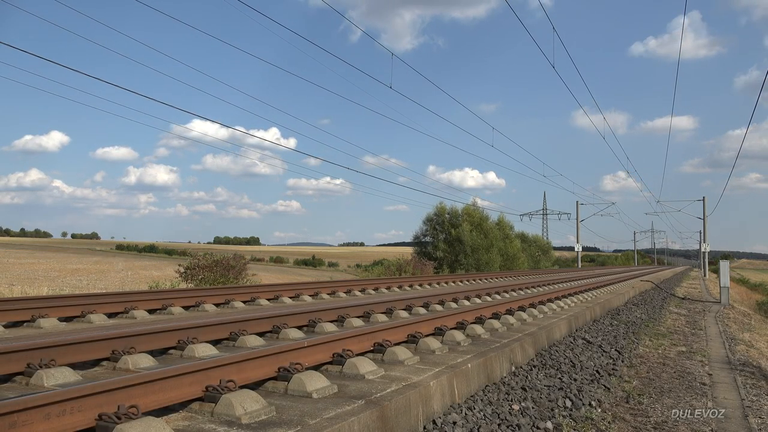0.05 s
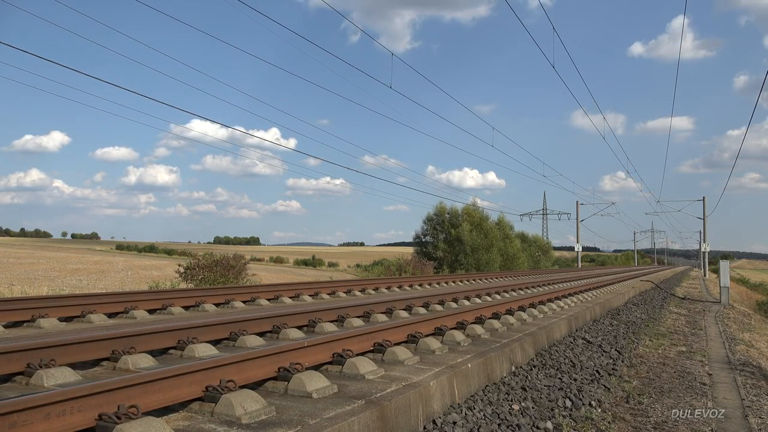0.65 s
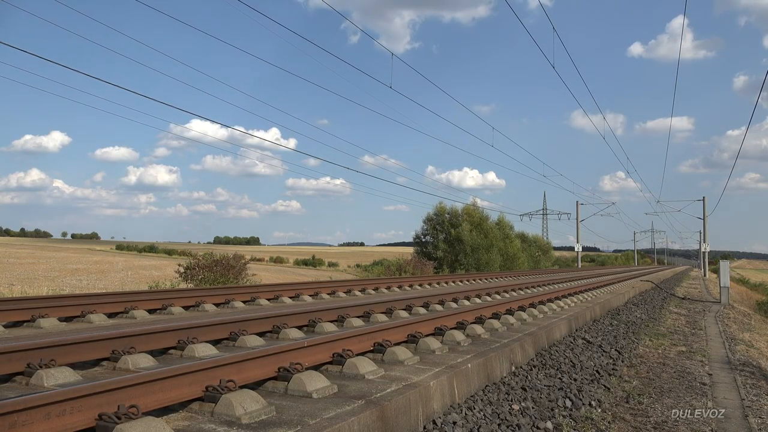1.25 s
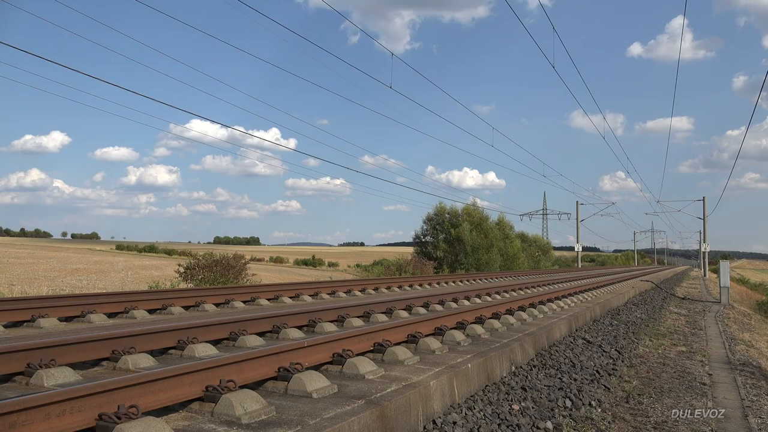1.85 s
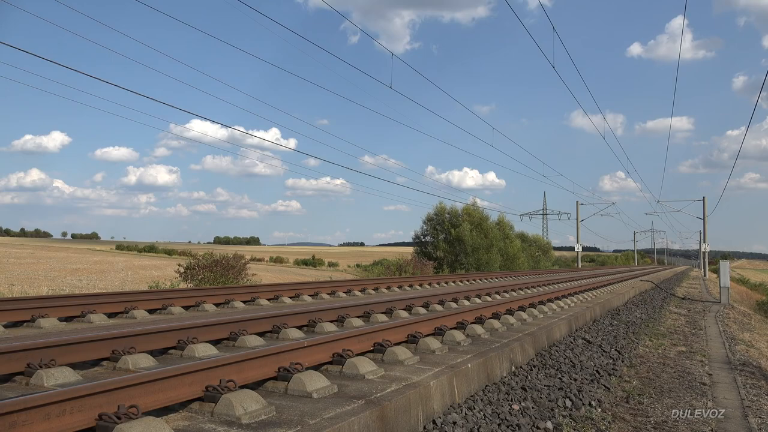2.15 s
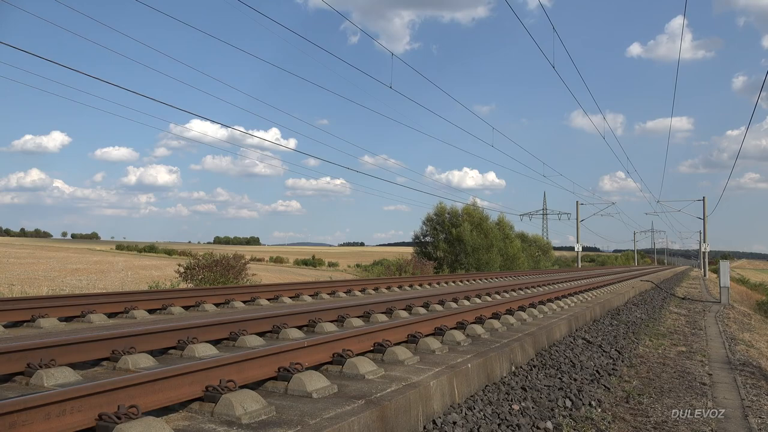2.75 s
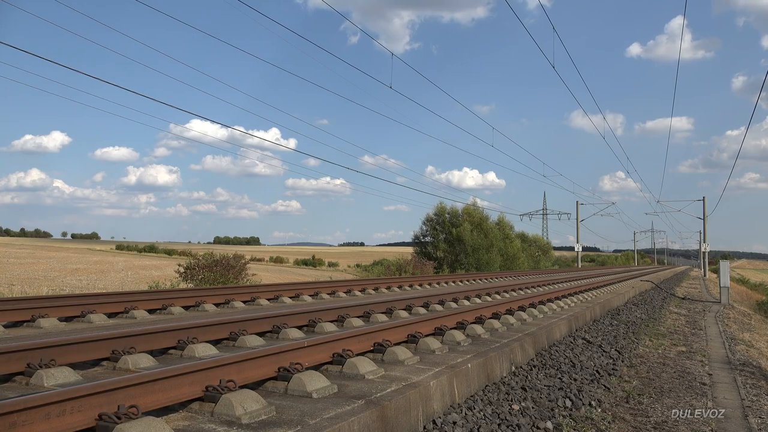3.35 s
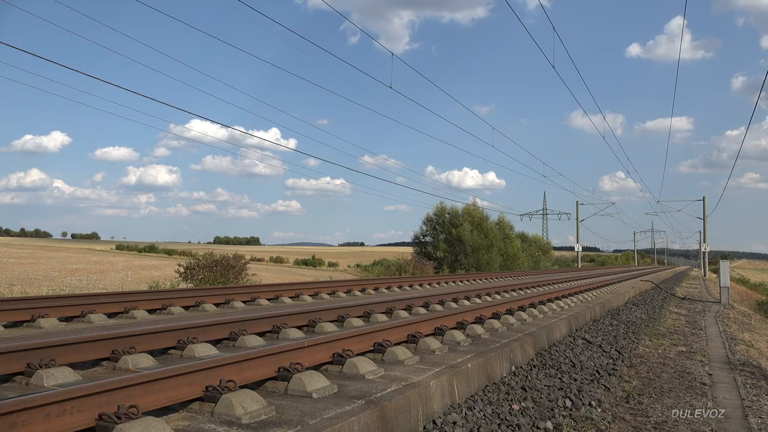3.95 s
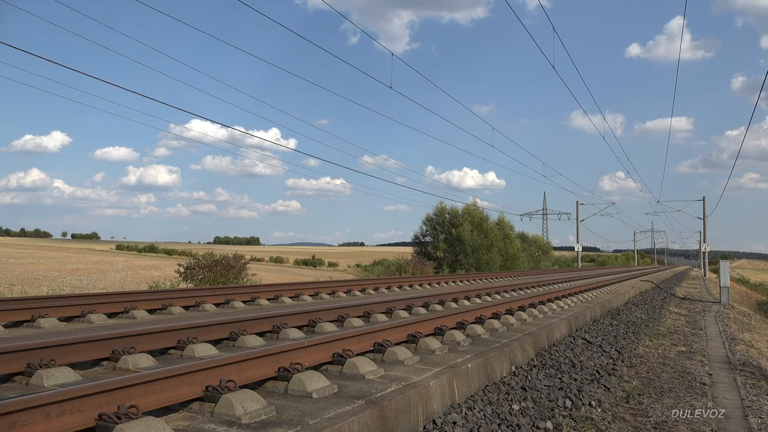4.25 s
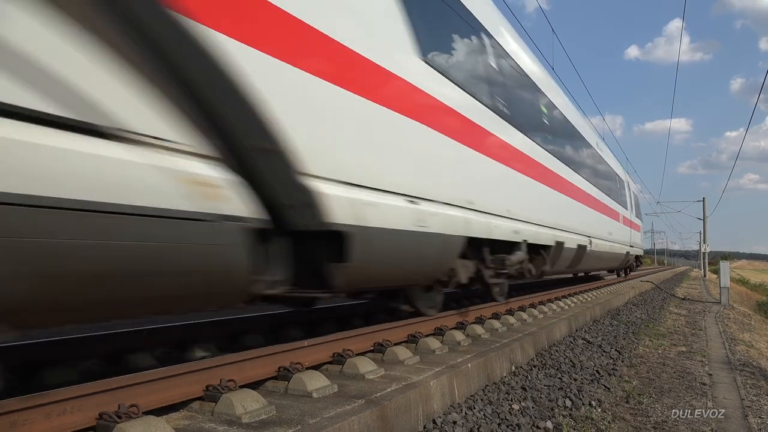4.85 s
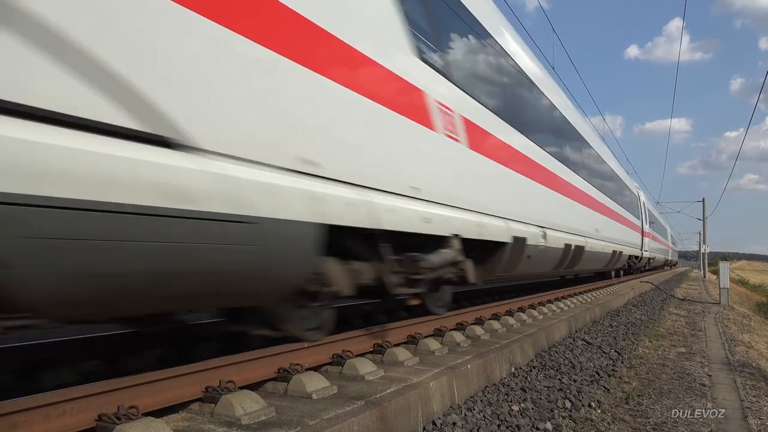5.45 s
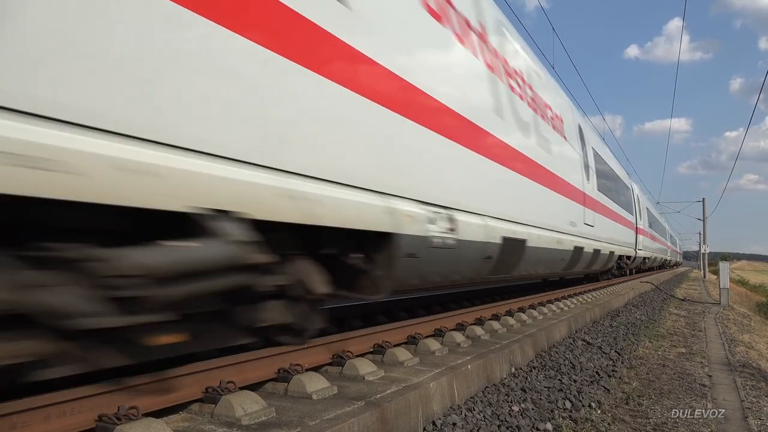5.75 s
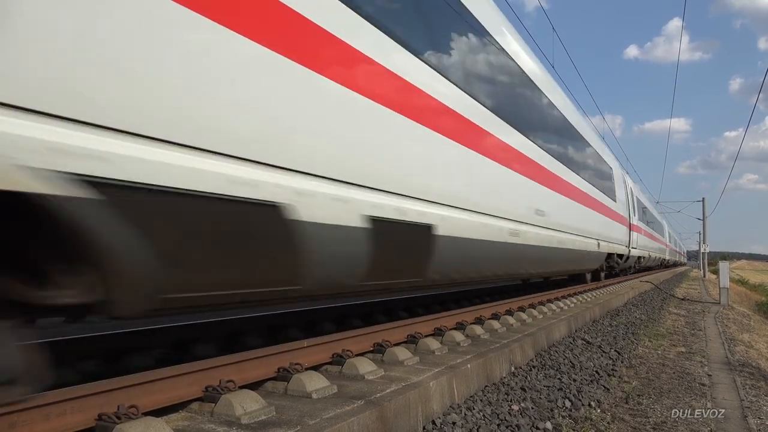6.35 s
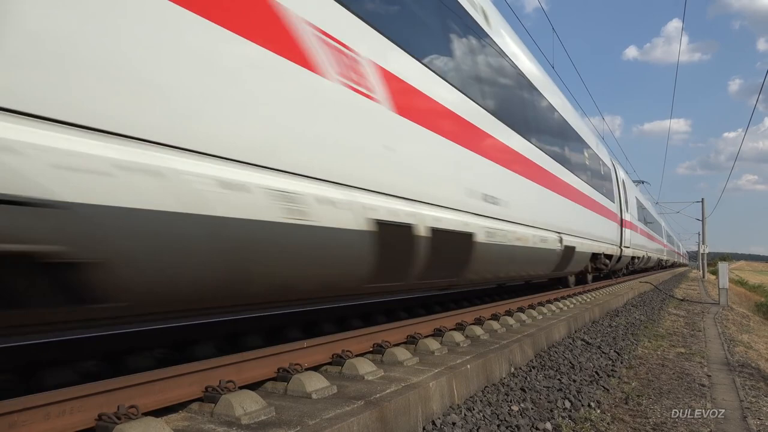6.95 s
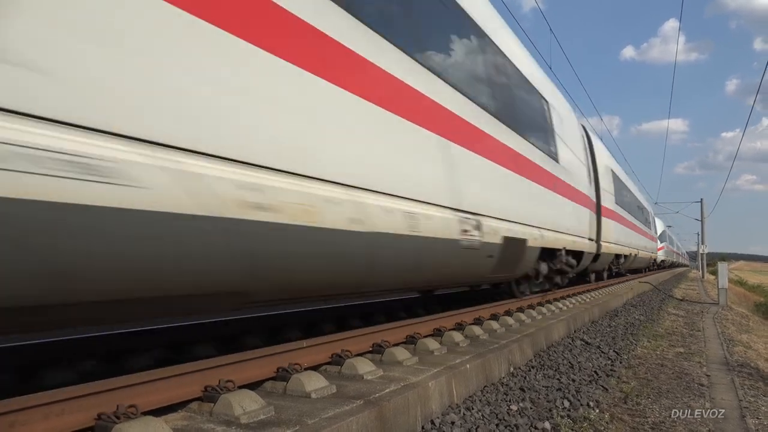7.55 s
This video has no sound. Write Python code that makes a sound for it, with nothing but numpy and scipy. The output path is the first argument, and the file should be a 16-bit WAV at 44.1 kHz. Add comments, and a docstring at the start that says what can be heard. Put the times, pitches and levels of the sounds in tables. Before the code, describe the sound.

Beside a track in open fields, a light breeze and a distant rush lie under the low drone and high sizzle of the rails. A few dry ticks sound, and ringing, hum and whine grow as a high-speed electric train nears. It then passes close, slightly left of the stereo microphone, with loud wheel roar, hissing air and short falling howls. Its slipstream thumps the microphone, and it is still passing at the end.

```python
"""A high-speed electric train comes up a slab track through open fields and passes a stereo microphone.
First, over a breeze and a distant rush, the rails carry its sound ahead: a low drone and a high sizzle,
with a few ticks from the track. Ringing bands, a hum and a whine grow as the wheels draw near.
As the nose comes level, wheel roar and air rush take over; then short falling howls go by and the
slipstream buffets the microphone. The train is still passing at the end."""
import sys
import numpy as np
from scipy import signal
from scipy.fft import rfft, irfft
from scipy.io import wavfile
from scipy.ndimage import uniform_filter1d, minimum_filter1d

SR = 44100
rng = np.random.default_rng(int(sys.argv[2]) if len(sys.argv) > 2 else 0)


def materialize(psi):
    """Save the field psi as 16-bit PCM at rate SR to the path in sys.argv[1].

    A 1-D psi becomes a single channel; in a 2-D psi each row is a channel.
    """
    bounded = np.clip(np.atleast_2d(psi).T, -1, 1)
    quanta = np.round(bounded * 32767).astype(np.int16)
    wavfile.write(sys.argv[1], SR, quanta)


N = 335160
TIME = np.arange(N) / SR
FREQ = np.maximum(np.arange(N // 2 + 1) * SR / N, 1)
NOSE_S = 4.84  # the nose draws level
ONSET_DB, ONSET_S = 6, 0.24  # depth and time constant of the track's opening swell
RING_END_S = 4.05  # the ringing, hum and sizzle start to fade

# Spectral envelopes of the noise sources: frequency_hz, gain_db
ROAR_SPECTRUM = [(150, -42), (250, -9), (335, -5), (397, -1), (476, -2.5), (518, -1.5), (656, 1), (880, -4),
                 (1330, -4), (1510, -5.5), (1990, -7.5), (2400, -11.5), (3120, -19), (5280, -120)]
CHURN_SPECTRUM = [(70, -3), (115, -3.5), (150, -0.5), (200, -6), (260, -8), (330, -10.5)]
RUSH_SPECTRUM = [(1700, -2.5), (2300, -1), (3200, -1), (4200, -0.5), (5300, -2), (6300, -6.5), (7200, -9),
                 (9000, -12), (11000, -16), (13000, -22), (15000, -32)]
RUMBLE_SPECTRUM = [(20, -25), (35, -8), (50, -2.5), (75, 2), (105, -2), (150, -10)]
DRONE_SPECTRUM = [(90, -17), (125, -12), (165, -5), (195, -1.5), (215, -0.5), (240, -1.5), (262, -7.5),
                  (280, -15), (350, -21), (480, -23.5), (600, -55)]
SIZZLE_SPECTRUM = [(9300, -23), (10100, -8), (10400, -2), (10800, 1.5), (11600, 0), (12300, -1), (12850, 3),
                   (13400, -2), (13750, -8), (14100, -6), (14550, -6), (15200, -16)]
TICK_SPECTRUM = [(900, -25), (2200, -1), (3500, 1), (5400, -8), (7500, -9), (10500, -6), (13000, -25)]
DISTANT_SPECTRUM = [(180, -41), (300, -11), (441, -9.5), (620, -7.5), (790, -2), (1160, -4), (1380, -8.5),
                    (2650, -18.5), (3420, -28.5), (9000, -42.5), (11700, -75), (19800, -120)]
# Loud bogies sweeping past: centre_s, roar_change_db, rush_change_db
BOGIE_SURGES = [(4.055, 2.5, 4), (4.17, 0, 4), (4.4, 0.5, 1), (4.65, -3, -1.5), (4.77, 1.5, 0.5),
                (5.33, 2, 0.5), (5.39, -0.5, 1), (5.59, -1, 1.5), (5.9, -4.5, 1.5), (6.23, 2.5, 3.5),
                (6.54, 0, -0.5), (6.86, -1.5, 1.5), (7.02, 2.5, 2.5), (7.15, 4.5, 3)]
# Brief dips in the level of the passing noise, mostly in the hiss:
# centre_s, half_length_s, roar_change_db, rush_change_db, rumble_change_db
LEVEL_DIPS = [(5.115, .06, -0.5, -4, -0.5), (5.726, 0.016, -1.5, -5, 1), (6.06, 0.053, -1.5, 0, 1),
              (6.437, 0.026, 0, -1.5, -4), (6.54, 0.075, 4, 1.5, -1), (7.085, 0.012, -4.5, -6, -4),
              (7.246, 0.041, -1.5, -5, -1), (7.563, 0.04, -4, -8.5, 4.5)]
# Short falling howls and flares of the whine:
# centre_s, pitch_hz, width_hz, level_db, half_length_s, pitch_fall_fraction_per_s
PASSING_HOWLS = [(4.506, 422, 220, -23.5, 0.042, .1), (5.066, 1120, 250, -23, 0.066, 0.16),
                 (5.202, 1140, 300, -21, .03, .15), (5.22, 660, 300, -18.5, 0.062, 0.13),
                 (5.651, 1130, 170, -19, .045, 0.3), (5.737, 720, 100, -18, 0.074, 0.088),
                 (5.91, 500, 302, -20, 0.057, .15), (6.014, 1285, 45, -23.5, 0.034, 0.11),
                 (6.509, 610, 201, -13, 0.058, 0.33), (6.643, 765, 500, -21, .03, .2),
                 (6.859, 605, 180, -20.5, 0.026, 0.18), (7.062, 1370, 60, -26.5, .035, .1),
                 (7.411, 1380, 120, -21.5, 0.047, 0.2), (7.423, 1820, 500, -23, 0.042, .19)]
# Waves in the rail, the well damped ones late and fast:
# pitch_hz, width_hz, relative_level_db, rise_db_per_s
RAIL_WAVES = [(425, 67, -46, 11), (610, 78, -34, 33), (850, 45, -39.5, 30), (1200, 66, -37.5, 15),
              (1120, 160, -40, 10), (1740, 71, -37.5, 40), (1930, 160, -39.5, 13.5), (2810, 150, -50, 7.5),
              (3200, 1000, -47, 7.5), (3586, 52, -52, 7), (3830, 40, -57, 6), (4040, 62, -51.5, 7),
              (6140, 120, -44, 17.5), (6740, 72, -44, 12), (7430, 200, -59, 21), (9750, 160, -46.5, 10.5),
              (11820, 70, -56, 6), (12920, 130, -57, 7)]
# Overtones of the wheel turn: pitch_hz, rise_end_s, relative_level_db, rise_db_per_s
WHEEL_OVERTONES = [(197.5, 4.2, -28, 25), (362, 3.9, -42, 19), (394, 3.62, -36, 17.5),
                   (424.3, 3.48, -37, 14.5), (457, 3.7, -42, 18), (497, 4.15, -39, 25),
                   (568, 4.03, -37.5, 24), (595, 4.22, -35, 25), (622, 4.14, -38, 38),
                   (848, 4.04, -45.5, 30), (1167, 3.9, -42, 31), (1200, 3.97, -39.5, 34)]
# Cracks from the track: start_s, relative_level_db, ping_to_crack_db
TRACK_TICKS = [(0.3664, -41, -4), (0.7996, -49, -7), (3.4072, -35, -17), (3.4161, -28, -12),
               (3.4284, -23, -16), (3.47, -24, -15), (3.4972, -22, -13), (3.5034, -36, -6)]
# Slipstream thumps on the microphone: centre_s, level_db, half_length_s
SLIPSTREAM_GUSTS = [(6.332, -22.5, 0.024), (7.52, -20.5, 0.028)]
# The two microphone ports, alike except in the treble:
# frequency_hz, coherence_ratio, left_lead_rad, left_minus_right_db
MICROPHONE_PORTS = [(100, 1, 0, 0), (1170, 1, 0, 0), (3700, 1, 0, 1.8), (5500, 1, -1, -1),
                    (6300, 0.99, 1, 0), (7500, 0.2, 1.63, 0.2), (8500, .45, 1.5, 2), (9700, 0.54, 3, 3),
                    (11000, 0.63, 4, 1), (12160, .55, 5, -2.5), (12800, .8, 6.5, 2), (14300, .65, 6.2, -5)]


def wheel_roar(side_db, roar_change_db, churn_change_db, screen_db=-4, ebb_db_per_s=0.13):
    """Rolling noise: the bogies roar, and turbulence churns under the cars once they are alongside."""
    roar_db = -17.5 + approach(NOSE_S, near_s=0.71, steepness=3.4) + roar_change_db
    roar_db += screen_db * (1 - alongside()) - ebb_db_per_s * since(NOSE_S)
    roar = turbulence(envelope(ROAR_SPECTRUM)) * undb(roar_db + 0.67 * walk(16))
    churn = turbulence(envelope(CHURN_SPECTRUM)) * undb(-23 + churn_change_db) * alongside()
    return pan(roar + churn, side_db)


def air_rush(change_db, screen_db=-2):
    """Aerodynamic noise: eddies hiss along skirts and wheels, screened until the nose is almost level."""
    level_db = -23 + approach(NOSE_S, near_s=1.0, steepness=5.45) + change_db
    level_db += screen_db * (1 - alongside()) + 0.5 * car_cycle() + 0.68 * walk(30)
    rush = turbulence(envelope(RUSH_SPECTRUM)) * undb(level_db)
    return pan(rush, 2.57 + 0.25 * car_cycle())


def passing_howls(side_db):
    """Doppler effect: short howls and flares of the whine swell and fall in pitch as they go by."""
    howls = np.zeros((2, N))
    for centre_s, hz, width_hz, level_db, half_s, fall in PASSING_HOWLS:
        doppler = 1 - fall * half_s * np.tanh((TIME - centre_s) / half_s)
        howl = bend(turbulence(resonance(hz, width_hz)), doppler)
        howls += howl * undb(level_db) * swell(centre_s, half_s)
    return pan(howls, side_db)


def slab_vibration(rumble_change_db, drone_end_s=4.5, cut_db_per_s=106):
    """Forced vibration: wheels shake the slab into a rumble and a drone that ends as the nose arrives."""
    rumble_db = -25 + approach(arrival_s=4.02, near_s=0.41, steepness=1.32) + rumble_change_db
    drone_db = -18 + approach(arrival_s=4.21, near_s=0.53, steepness=1.64)
    drone_db += onset_db() - cut_db_per_s * since(drone_end_s)
    rumble = turbulence(envelope(RUMBLE_SPECTRUM)) * undb(rumble_db)
    drone = turbulence(envelope(DRONE_SPECTRUM)) * undb(drone_db)
    side_db = np.interp(TIME, [0.7, 2.5], [-1.5, 2.2])  # from the right over to the left
    return pan(rumble, side_db) + pan(drone, 4.3)


def rail_ringing(arrival_s=4.25, gain_db=2, treble_hz=5000, treble_fade_db_per_s=28):
    """Guided waves: rough wheels excite the rail, and each wave grows as its path in steel shortens."""
    comb = wheel_comb()
    treble_fade_db = treble_fade_db_per_s * since(3.96)  # the highest waves fade first
    ringing = 0
    for hz, width_hz, arrival_db, rise_db_per_s in RAIL_WAVES:
        level_db = arrival_db - rise_db_per_s * until(arrival_s) - treble_fade_db * (hz > treble_hz)
        ringing += turbulence(resonance(hz, width_hz) * comb) * undb(level_db)
    return pan(ringing * undb(rail_level_db() + gain_db), 1.6)


def wheel_comb(turn_hz=32.7, memory=0.8, fade_hz=1200):
    """Comb filtering: out-of-round wheels repeat their blows each turn; fine roughness is always new."""
    repeat = memory * np.exp(-(FREQ / fade_hz) ** 2)
    return 1 / np.abs(1 - repeat * np.exp(-2j * np.pi * FREQ / turn_hz))


def wheel_hum(gain_db=-0.8):
    """Periodic forcing: wheel turns give nearly pure tones, wavering as the wheels drift out of step."""
    hum = 0
    for hz, rise_end_s, full_db, rise_db_per_s in WHEEL_OVERTONES:
        phase = 2 * np.pi * np.cumsum(hz + 1.16 * walk(12)) / SR
        level_db = full_db - rise_db_per_s * until(rise_end_s) + 0.75 * walk(9)
        hum += np.sqrt(2) * np.sin(phase) * undb(level_db)
    return pan(hum * undb(rail_level_db() + gain_db), 0.6)


def corrugation_whine(ease_db_per_s=1.0, flicker_db=3, climb_s=6.3, climb_per_s=0.055):
    """Corrugation noise: ripples on the rail head set one pitch for the wheels; it creeps up late on."""
    level_db = -31 + approach(arrival_s=4.2, near_s=0.52, steepness=4.9)
    level_db += 6 * swell(3.5, half_s=0.03) - ease_db_per_s * since(NOSE_S)
    level_db += flicker_db * (walk(11) - 0.5) * alongside()
    line = turbulence(resonance(hz=1301, width_hz=16.6))
    band = turbulence(resonance(hz=1241, width_hz=114)) * undb(-1)
    whine = bend(line + band, 1 + climb_per_s * since(climb_s))
    return pan(whine * undb(level_db), 10.8)


def rail_sizzle(ripple_db=1.1, rise_db_per_s=5.5):
    """Low attenuation: the highest waves lose least in steel, so their crowded modes sizzle far ahead."""
    mode_ripple = np.interp(FREQ, np.linspace(0, SR / 2, 400), rng.standard_normal(400))
    sizzle = turbulence(envelope(SIZZLE_SPECTRUM) * undb(ripple_db * mode_ripple))
    level_db = -41.5 - rise_db_per_s * until(RING_END_S) + rail_level_db() + 0.36 * walk(18)
    return pan(sizzle * undb(level_db), 3.4)


def track_ticks(decay_s=0.0037, delay_s=0.00115, gain_db=-6):
    """Damped transients: the track cracks drily as the load nears, sometimes with a bright ping."""
    crack_gain = ping_gain = 0
    for start_s, level_db, ping_db in TRACK_TICKS:
        age_s = TIME - start_s - delay_s
        strike = undb(level_db + gain_db) * (age_s >= 0) * np.exp(-np.abs(age_s) / decay_s)
        crack_gain += strike
        ping_gain += strike * undb(ping_db)
    cracks = turbulence(envelope(TICK_SPECTRUM)) * crack_gain
    pings = turbulence(resonance(hz=5700, width_hz=1400)) * ping_gain
    return cracks + pings


def wind_buffeting(draught_db_per_s=3):
    """Turbulent pressure on the microphone: a breeze freshens, then the slipstream builds and thumps."""
    breeze_db = -43.5 - 7.5 * swell(0, half_s=0.5) + draught_db_per_s * since(NOSE_S)
    breeze = turbulence(resonance(hz=33.7, width_hz=17)) * undb(breeze_db)
    gust_gain = sum(undb(db) * swell(centre_s, half_s) for centre_s, db, half_s in SLIPSTREAM_GUSTS)
    return breeze + turbulence(resonance(hz=62, width_hz=60)) * gust_gain


def distant_rush():
    """Ambient noise: a soft rush from the right sinks a little, swells once in the mids, then holds."""
    rush = turbulence(envelope(DISTANT_SPECTRUM)) * undb(-51 + 2.5 * swell(0, half_s=0.27))
    mids = turbulence(resonance(hz=1240, width_hz=310)) * undb(-51) * swell(0.83, half_s=0.058)
    return pan(rush + mids, np.interp(TIME, [0.7, 3], [-11, -4]))


def level_changes_db(surge_half_s=0.024, ease_db_per_s=1.7):
    """Amplitude modulation: the level dips briefly, roar and rush surge, and the rumble slowly eases."""
    roar, rush, rumble = sum(np.outer(dbs, swell(s, half_s)) for s, half_s, *dbs in LEVEL_DIPS)
    roar_surge, rush_surge = sum(np.outer(dbs, swell(s, surge_half_s)) for s, *dbs in BOGIE_SURGES)
    return roar + roar_surge, rush + rush_surge, rumble - ease_db_per_s * since(NOSE_S)


def car_cycle(first_bogie_s=5.05, period_s=0.338):
    """Periodic modulation between -1 and 1, highest as each pair of bogies goes by."""
    return np.cos(2 * np.pi * (TIME - first_bogie_s) / period_s) * (TIME > NOSE_S)


def onset_db():
    """Build-up of vibration as the train rolls onto this stretch of track."""
    return -ONSET_DB * np.exp(-TIME / ONSET_S)


def rail_level_db(fade_db_per_s=8, mute_db_per_s=16):
    """Amplitude envelope of ringing, hum and sizzle: it rises, holds, then fades ever faster."""
    return onset_db() - fade_db_per_s * since(RING_END_S) - mute_db_per_s * since(NOSE_S)


def approach(arrival_s, near_s, steepness):
    """Power law of distance: level in dB of a source nearing at steady speed, flat once it arrives."""
    return -10 * steepness * np.log10(1 + (until(arrival_s) / near_s) ** 2)


def alongside():
    """Acoustic screening: opens from 0 to 1 as the nose stops hiding the wheels behind it."""
    return np.interp(TIME, [4.53, 4.61], [0, 1])


def turbulence(response):
    """Random forcing through a frequency response, partly coherent between the two ports; rms 1."""
    hz, *columns = np.transpose(MICROPHONE_PORTS)
    coherence, lead_rad, side_db = (np.interp(FREQ, hz, column) for column in columns)
    left, independent = rfft(rng.standard_normal((2, N)))
    right = (coherence * left + np.sqrt(1 - coherence ** 2) * independent) * np.exp(-1j * lead_rad)
    noise = irfft(pan(np.array([left, right]) * response, side_db), N)
    return noise / noise.std()


def envelope(points):
    """Spectral envelope: gain through (Hz, dB) points, falling 60 dB an octave past the ends."""
    hz, db = np.transpose(points)
    octaves_outside = np.maximum(0, np.maximum(np.log2(hz[0] / FREQ), np.log2(FREQ / hz[-1])))
    return undb(np.interp(np.log(FREQ), np.log(hz), db) - 60 * octaves_outside)


def resonance(hz, width_hz):
    """Steep resonance: the gain of a band-pass applied twice."""
    return 1 / (1 + ((FREQ / hz - hz / FREQ) * hz / (1.5 * width_hz)) ** 2)


def walk(rate_hz):
    """Smooth random fluctuation of spread 1 that changes about rate_hz times a second."""
    points = rng.standard_normal(1024)
    step = int(SR / rate_hz)
    drift = uniform_filter1d(points[np.arange(N) // step % len(points)], step)
    return drift / drift.std()


def bend(x, ratio):
    """Resampling shifts the pitch of a stereo sound by a ratio that changes over time."""
    clock = np.cumsum(ratio) % (N - 1)
    return np.array([np.interp(clock, np.arange(N), side) for side in x])


def pan(x, side_db):
    """Level difference: tips a sound to the left by side_db."""
    return x * undb(np.array([[0.5], [-0.5]]) * side_db)


def swell(centre_s, half_s):
    """Gaussian rise and fall about centre_s."""
    return np.exp(-0.5 * ((TIME - centre_s) / half_s) ** 2)


def since(s):
    """Seconds elapsed since time s, zero before it."""
    return np.maximum(TIME - s, 0)


def until(s):
    """Seconds left until time s, zero after it."""
    return np.maximum(s - TIME, 0)


def undb(db):
    """Decibels to amplitude ratio."""
    return 10 ** (np.asarray(db) / 20)


def scene():
    """Superposition of the track's vibration, the passing train and the open air."""
    # the train lies to the left, swings further as the nose arrives and sways with each car
    side_db = 3.5 + 0.75 * since(NOSE_S) + 5.5 * swell(4.47, half_s=0.31) + 0.7 * car_cycle()
    roar_db, rush_db, rumble_db = level_changes_db()
    track = slab_vibration(rumble_db) + wheel_hum() + rail_ringing() + rail_sizzle() + track_ticks()
    wheels = wheel_roar(side_db, roar_db, rumble_db) + corrugation_whine()
    train = wheels + air_rush(rush_db) + passing_howls(side_db)
    return track + train + wind_buffeting() + distant_rush()


def record(dry, ceiling=0.59, hold_s=0.0098, cutoff_hz=15200):
    """Peak limiting ducks the gain round each peak above the ceiling; a low-pass then cuts the top."""
    hold = int(hold_s * SR)
    gain = ceiling / np.maximum(np.abs(dry).max(axis=0), ceiling)
    smooth_gain = uniform_filter1d(minimum_filter1d(gain, hold), hold)
    low_pass = signal.ellip(8, 0.2, 70, cutoff_hz, fs=SR, output="sos")
    return signal.sosfilt(low_pass, dry * smooth_gain)


dry = scene()
out = record(dry)
materialize(out)
```